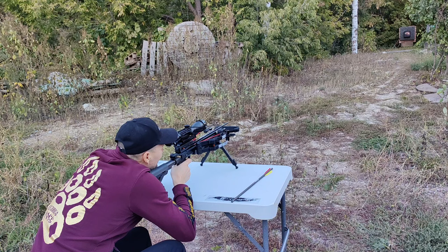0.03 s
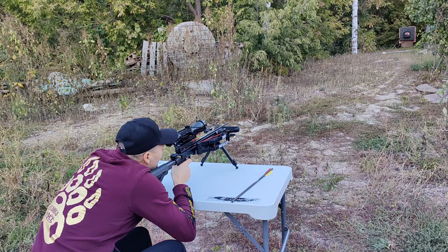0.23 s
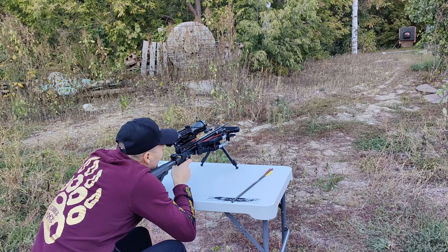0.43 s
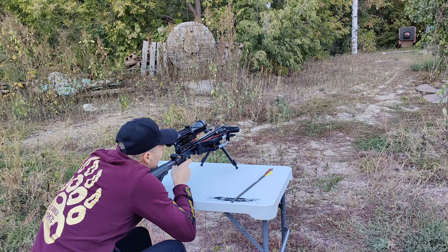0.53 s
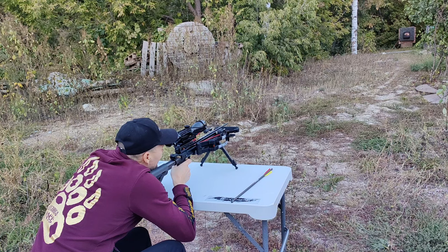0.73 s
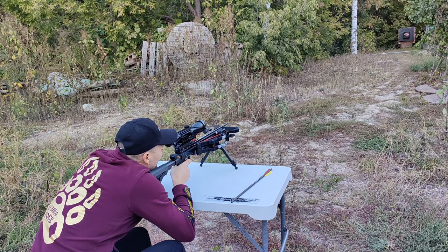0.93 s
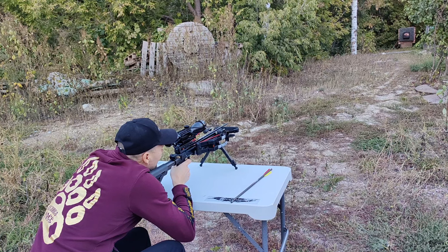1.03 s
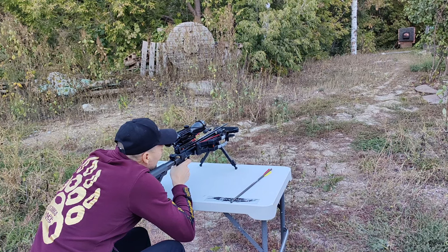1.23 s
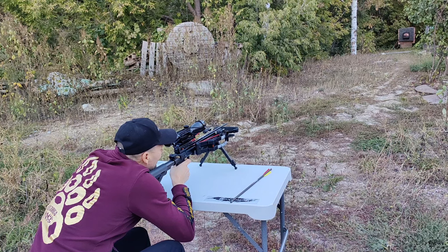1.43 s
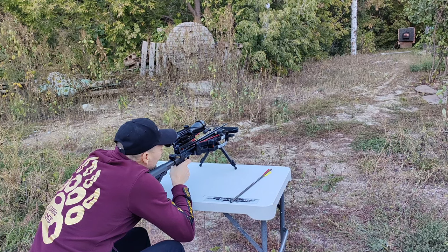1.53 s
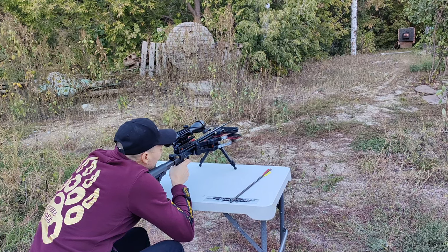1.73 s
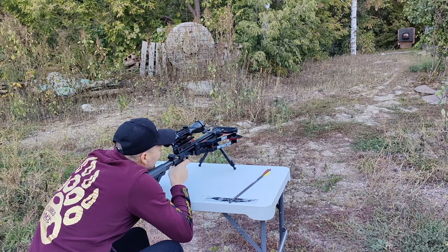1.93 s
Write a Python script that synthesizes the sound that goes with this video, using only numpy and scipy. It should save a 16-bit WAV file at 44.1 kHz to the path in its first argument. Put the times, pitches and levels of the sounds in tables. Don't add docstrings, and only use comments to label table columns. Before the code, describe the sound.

A crossbow fires once, close by: steel latch click, hard string crack, limb clatter and a short table boom, after almost two seconds of faint outdoor wash and dull low thuds, heard a few metres away in stereo.

```python
import sys
import numpy as np
from scipy import signal
from scipy.fft import rfft, irfft
from scipy.io import wavfile
from scipy.ndimage import uniform_filter1d

SR = 44100
rng = np.random.default_rng(int(sys.argv[2]) if len(sys.argv) > 2 else 0)


def dump(signal):
    limited = np.clip(np.atleast_2d(signal).T, -1, 1)
    pcm = np.round(limited * 32767).astype(np.int16)
    wavfile.write(sys.argv[1], SR, pcm)


def volts(x):
    e = np.asarray(x, float) / 20
    return 10 ** e


N = 88200
PAD = N + SR // 10

# (frequency [Hz], density [dB per Hz])
HISS_SPECTRUM = [(6500, -23.5), (7700, 1.5), (8800, -4.5), (10700, -9.5), (14400, -6), (15000, -18),
                 (15300, -41)]
HISS_DB = -93.5

# (frequency [Hz], density [dB per Hz])
GARDEN_SPECTRUM = [(25, -27), (125, -5), (335, -11.5), (1200, -18), (2200, -19.5), (4200, -24.5),
                   (7500, -35), (7800, -62)]
# (frequency [Hz], left minus right [dB])
GARDEN_PAN = [(60, -7), (110, -6), (200, 2.5), (380, -0.5), (700, -0.5), (1290, -0.5), (2380, -2.0),
              (4400, -5), (8120, -7), (15000, 2.5)]
# (frequency [Hz], side level [dB])
GARDEN_WIDTH = [(5200, -0.5), (6000, -5.5), (7500, -7.5), (7700, -37)]
GARDEN_DB, GARDEN_LEAD_MS = -65.5, 0.462
GARDEN_SHARED, BASS_SHARED, BASS_HZ = 0.19, 0.68, 300

# (time [s], level [dB], pitch [Hz])
THUDS = [(0.096, -58, 105.5), (0.296, -57.5, 136), (0.424, -53, 146), (0.611, -56.5, 121),
         (0.77, -50, 139.5), (0.893, -50, 141), (0.978, -59, 95), (1.187, -54, 157), (1.337, -53, 132.4),
         (1.579, -54, 88), (1.689, -52, 136), (1.793, -55.5, 135)]
THUD_DB, THUD_S = -3.5, 0.047

# (time [s], level [dB])
BOLT_LEVEL = [
    (1.925, -70),
    (1.940, -38.5),
    (1.957, -39),
    (1.985, -42.5),
    (2.0, -45.5),
]
# (frequency [Hz], density [dB per Hz])
BOLT_SPECTRUM = [(300, -12), (2680, -2.5), (3500, -11), (5200, -3.5), (8900, -4), (11000, -15),
                 (14900, -13), (15200, -70)]
BOLT_SHARED, BOLT_FLUTTER_DB, BOLT_FLUTTER_PER_S = 0.416, 0.5, 300

# (time [s], level [dB], contact [ms], direction and strength [-1 to 1])
PUSHES = [
    (1.9120, -37, 1.46, 0.79),
    (1.9161, -29.5, 0.96, -0.91),
    (1.9192, -27, 1.33, -0.84),
    (1.9258, -20.5, 1.07, 0.88),
    (1.9330, -27.5, 0.56, 0.76),
    (1.9396, -29, 0.65, 0.98),
    (1.942, -26.5, 0.74, 0.97),
    (1.9540, -32, 1.52, 1),
]
# (frequency [Hz], level [dB], t60 [s])
TABLE_MODES = [(149.6, -14.5, 0.33), (172.77, -7.5, 0.46), (208.3, -10, 0.13), (241.3, 3.5, 0.099),
               (290.1, 4.5, 0.178), (347.6, -25, 0.171), (520, -26, 0.033), (659.6, -4, 0.13),
               (710.8, -6, 0.2), (840, -2.5, 0.17), (947, -6, 0.17), (1019, 1.5, 0.12), (1098, -7, 0.16)]
TABLE_CUT_HZ = 126
TABLE_SIDE_DB, TABLE_PAN_DB = -20.5, 0.3

# (time [s], level [dB], burst length [ms])
LATCH_TICKS = [
    (1.9022, -58, 3.5),
    (1.9039, -26.5, 0.79),
    (1.9058, -15, 1.02),
    (1.9065, -11, 1.66),
    (1.9078, -26.5, 4),
    (1.9100, -34, 4.7),
]
# (frequency [Hz], level [dB], t60 [s])
LATCH_MODES = [(2080, 4, 0.0113), (3100, -3, 0.014), (3730, -8, 0.014), (5170, -13, .02),
               (5920, -5.5, 0.034), (7050, -1.5, 0.018), (9650, -15, 0.0057), (12000, -10.5, .008)]
# (frequency [Hz], density [dB per Hz])
LATCH_SPECTRUM = [(300, -23), (800, -14), (2300, -2.5), (5000, -4), (7500, 3.5), (10500, -7.5), (15200, -5),
                  (16500, -16)]
LATCH_RING_DB, LATCH_SHARED, LATCH_PAN_DB = -3.5, 0.23, 6
LATCH_PUFF_S, LATCH_PUFF_DB, LATCH_PUFF_MS = 1.9056, -25.5, 2.34

# (time [s], level [dB], burst length [ms])
SLAPS = [(1.9152, -20.5, 1.9), (1.9166, -20, 1.3), (1.9180, -20.5, 1.6), (1.9193, -20, 2.3),
         (1.9204, -15, 2.25), (1.9214, -17.5, 2.3), (1.9229, -11.5, 1.22), (1.9258, -14.5, 2.2),
         (1.9278, -21, 2), (1.9302, -19, 2.1), (1.9332, -23, 6.8), (1.9385, -26, 3.9), (1.9435, -40, 2.5),
         (1.9500, -34, 4.9)]
# (frequency [Hz], level [dB], t60 [s])
LIMB_MODES = [(1184, -18, .07), (1358, -11, 0.057), (1687.4, 3.5, 0.038), (1790, -0.5, 0.026),
              (2038, -7.5, 0.09), (2070, 2.5, .06), (2280, -12, 0.044), (2709, -2, 0.017),
              (2918, -3.5, 0.0207), (3100, -8, 0.04), (3162, -8, .05)]
# (frequency [Hz], density [dB per Hz])
SLAP_SPECTRUM = [(300, -81), (600, -11.5), (1000, -8), (1660, -6.5), (2700, 6), (3600, -7.5), (6000, -18),
                 (12000, -26)]
LIMB_RING_DB, SLAP_SHARED, SLAP_PAN_DB = 0.3, 0.96, -1.5

# (time [s], level [dB], burst length [ms])
CRACKS = [
    (1.9160, -21, 2.7),
    (1.9179, -10.5, 1.1),
    (1.9192, -14.5, 1.6),
    (1.9212, -18.5, 3.2),
    (1.9235, -23.5, 4),
    (1.9265, -23, 4.6),
    (1.9295, -28, 4),
    (1.9340, -25.5, 3),
    (1.9375, -30, 4.5),
]
# (frequency [Hz], level [dB], t60 [s])
CABLE_MODES = [(4065, 0, 0.067), (4520, -11, 0.05), (5200, -7, 0.037), (5260, 2, 0.025), (6000, -4, 0.033),
               (6360, 0, 0.037), (7730, -15, .04), (8700, -3, .03)]
# (frequency [Hz], density [dB per Hz])
CRACK_SPECTRUM = [(2500, -37), (3600, -6), (5300, 0), (7500, -1.5), (10000, -8.5), (15000, -19),
                  (15500, -60)]
CABLE_RING_DB, CRACK_SHARED, CRACK_PAN_DB = -7, 0.41, -1.5

BOW_LEAD_MS = 0.064
BODY_TOP_HZ, MICROPHONE_TOP_HZ = 15300, 16600


def curve(table, hz):
    table = np.array(table, float)
    return np.interp(np.log(np.maximum(hz, 1)), np.log(table[:, 0]), table[:, 1])


def colour(x, spectrum):
    gain = volts(curve(spectrum, np.arange(PAD // 2 + 1) * SR / PAD))
    gain = gain / np.sqrt(np.mean(gain ** 2))
    return irfft(rfft(x, PAD) * gain, PAD)[..., :N]


def highpass(x, order, hz):
    return signal.sosfilt(signal.butter(order, hz, "high", fs=SR, output="sos"), x)


def ring(x, modes):
    t = np.arange(SR // 4) / SR
    response = 0
    for hz, db, t60 in modes:
        decay = np.exp(-np.log(1000) * t / t60)
        response = response + volts(db) * decay * np.sin(2 * np.pi * hz * t)
    response = response / np.sqrt(np.sum(response ** 2))
    return signal.fftconvolve(x, response[None])[:, :N]


def late(x, ms):
    hz = np.arange(PAD // 2 + 1) * SR / PAD
    return irfft(rfft(x, PAD) * np.exp(-2j * np.pi * hz * ms / 1000), PAD)[:N]


def ports(shared, lead_ms, envelope=1):
    both, left, right = rng.standard_normal((3, N)) * envelope
    shared = np.clip(shared, 0, 1)

    def mix(common, own):
        return irfft(np.sqrt(shared) * rfft(common) + np.sqrt(1 - shared) * rfft(own), N)

    return np.array([mix(both, left), late(mix(both, right), lead_ms)])


def pan(db):
    return volts(np.array([[db], [-db]]) / 2)


def walk(rate):
    hold = int(SR / rate)
    steps = np.repeat(rng.standard_normal(N // hold + 1), hold)
    return 1.07 * uniform_filter1d(uniform_filter1d(steps, hold), hold)[:N]


def knocks(contacts, shared, spectrum, modes, ring_db):
    t = np.arange(N) / SR
    envelope = 0
    for start, db, ms in contacts:
        since = t - start
        onset = np.clip(since * 8000, 0, 1)
        decay = volts(-20 * np.clip(since, 0, 0.1) * 1000 / ms)
        envelope = envelope + volts(db) * onset * decay * (t < start + 0.1)
    burst = ports(shared, BOW_LEAD_MS, envelope)
    return colour(burst, spectrum) + volts(ring_db) * ring(burst, modes)


def microphone_hiss():
    return volts(HISS_DB) * colour(rng.standard_normal(N), HISS_SPECTRUM) * 1.634


def narrow(x):
    width = volts(curve(GARDEN_WIDTH, np.arange(N // 2 + 1) * SR / N))
    side = irfft(rfft(x[0] - x[1]) * width, N) / 2
    return x.mean(axis=0) + np.array([side, -side])


def garden():
    hz = np.arange(N // 2 + 1) * SR / N
    shared = GARDEN_SHARED + (BASS_SHARED - GARDEN_SHARED) / (1 + (hz / BASS_HZ) ** 2)
    air = rfft(colour(ports(shared, GARDEN_LEAD_MS), GARDEN_SPECTRUM))
    air = air * volts(curve(GARDEN_PAN, hz) * np.array([[0.5], [-0.5]]))
    octave = np.log2(np.maximum(hz, 1) / 31.25).clip(0, 9)
    out, swell = 0, walk(0.5)
    for k in range(10):
        band = np.cos(np.pi / 2 * np.clip(octave - k, -1, 1)) ** 2
        flicker_db = 1.6 if k < 4 else 0.6
        out = out + irfft(air * band, N) * volts(0.15 * swell + flicker_db * walk(12.9))
    upper = highpass(out.mean(axis=0), 4, 300)
    return narrow(out * volts(GARDEN_DB) / upper.std())


def thuds():
    t = np.arange(N) / SR
    x = 0
    for start, db, hz in THUDS:
        swell = np.sin(np.pi * np.clip((t - start) / THUD_S, 0, 1))
        x = x + volts(db + THUD_DB) * swell * np.sin(2 * np.pi * hz * (t - start))
    return np.array([x, late(x, 0.44)])


def bolt():
    level = np.interp(np.arange(N) / SR, *np.array(BOLT_LEVEL).T, left=-150)
    envelope = volts(level + BOLT_FLUTTER_DB * walk(BOLT_FLUTTER_PER_S))
    return colour(ports(BOLT_SHARED, 0, envelope), BOLT_SPECTRUM)


def table_top():
    t = np.arange(N) / SR
    force = 0
    for start, db, ms, way in PUSHES:
        force = force + way * volts(db) * np.sin(np.pi * np.clip((t - start) * 1000 / ms, 0, 1))
    boom = highpass(ring(force[None], TABLE_MODES)[0], 4, TABLE_CUT_HZ)
    side = volts(TABLE_SIDE_DB) * late(boom, 0.955) * (t > PUSHES[0][0])
    return np.array([boom + side, late(boom, BOW_LEAD_MS) - side]) * pan(TABLE_PAN_DB)


def latch():
    ticks = knocks(LATCH_TICKS, LATCH_SHARED, LATCH_SPECTRUM, LATCH_MODES, LATCH_RING_DB)
    step = np.clip((np.arange(N) / SR - LATCH_PUFF_S) * 1000 / LATCH_PUFF_MS, 0, 1)
    puff = highpass(np.sin(np.pi * step) ** 2, 3, 110)
    return ticks * pan(LATCH_PAN_DB) + volts(LATCH_PUFF_DB) * puff


def string():
    slap = knocks(SLAPS, SLAP_SHARED, SLAP_SPECTRUM, LIMB_MODES, LIMB_RING_DB) * pan(SLAP_PAN_DB)
    crack = knocks(CRACKS, CRACK_SHARED, CRACK_SPECTRUM, CABLE_MODES, CABLE_RING_DB) * pan(CRACK_PAN_DB)
    top_cut = signal.ellip(6, 0.3, 50, BODY_TOP_HZ, fs=SR, output="sos")
    return signal.sosfilt(top_cut, slap + crack)


def scene():
    background = microphone_hiss() + garden() + thuds()
    shot = bolt() + table_top() + latch() + string()
    return background + shot


def low_pass(x):
    return signal.sosfilt(signal.butter(12, 16660, fs=SR, output="sos"), x)


def record(dry):
    top_cut = signal.ellip(8, 0.2, 70, MICROPHONE_TOP_HZ, fs=SR, output="sos")
    mix = signal.sosfilt(top_cut, dry)
    return low_pass(mix)


dry = scene()
out = record(dry)
dump(out)
```